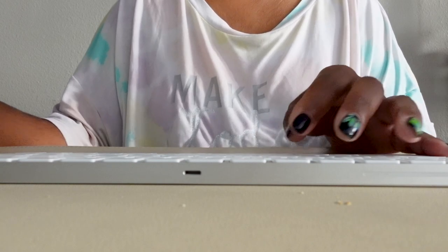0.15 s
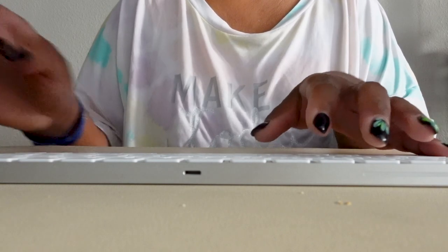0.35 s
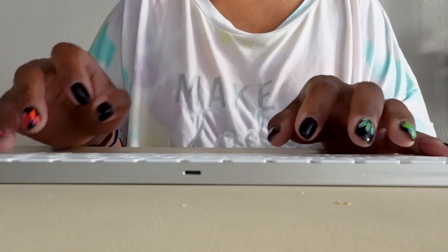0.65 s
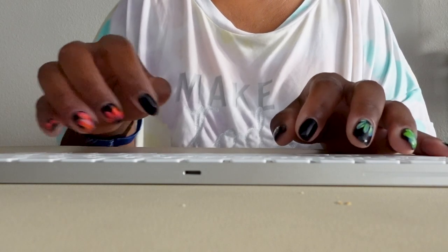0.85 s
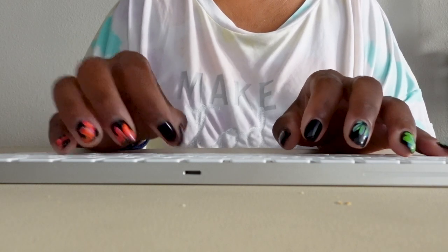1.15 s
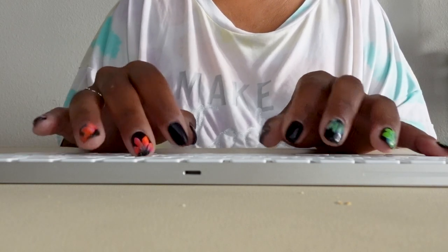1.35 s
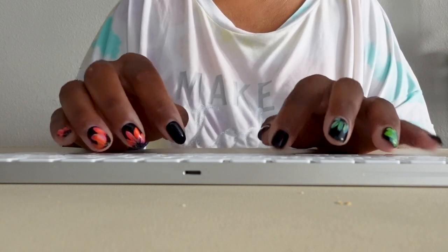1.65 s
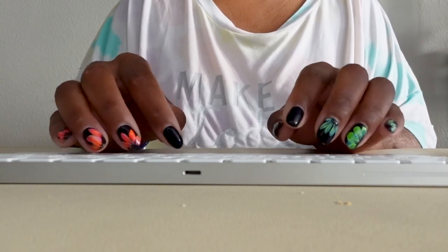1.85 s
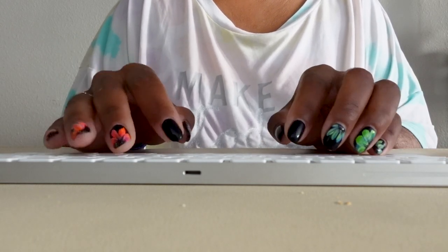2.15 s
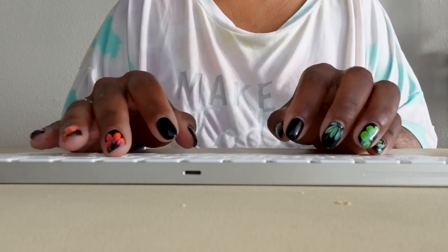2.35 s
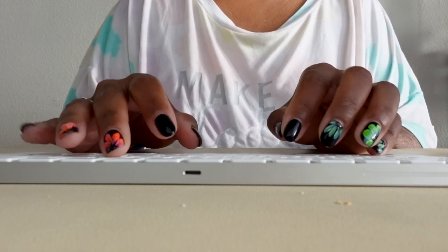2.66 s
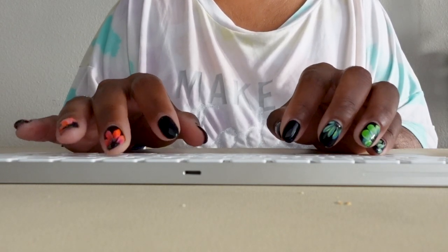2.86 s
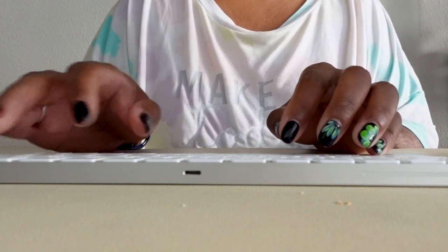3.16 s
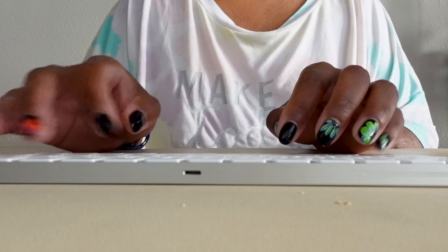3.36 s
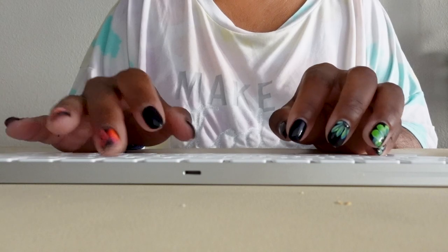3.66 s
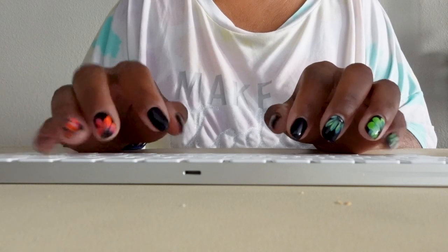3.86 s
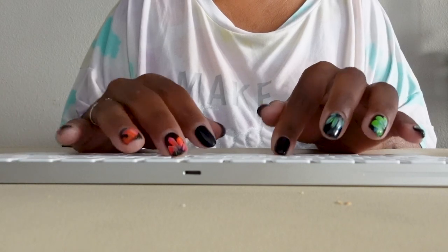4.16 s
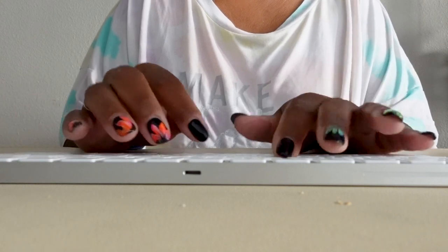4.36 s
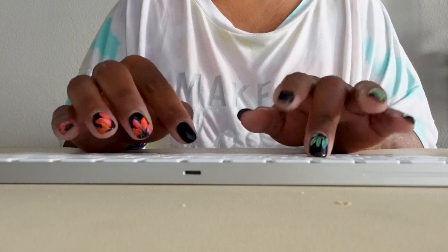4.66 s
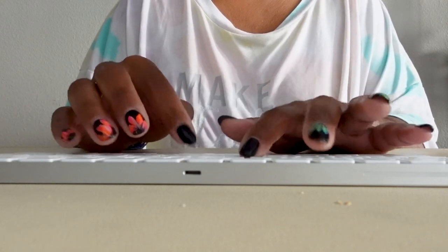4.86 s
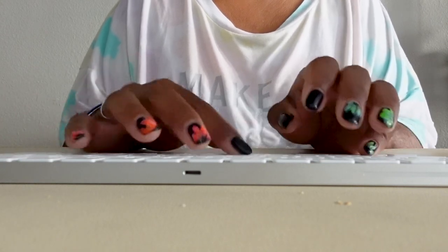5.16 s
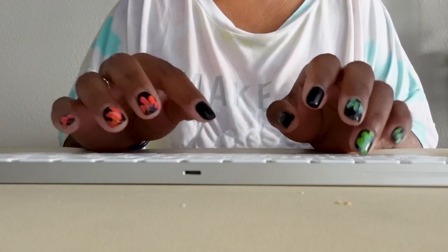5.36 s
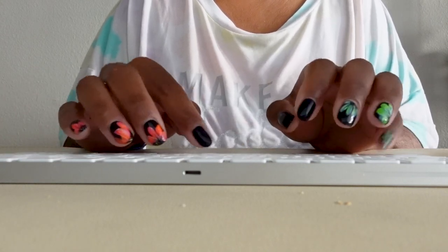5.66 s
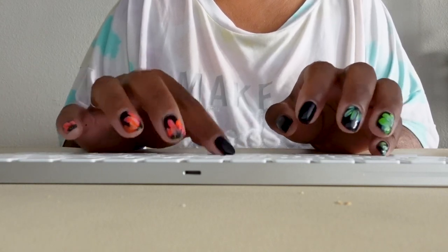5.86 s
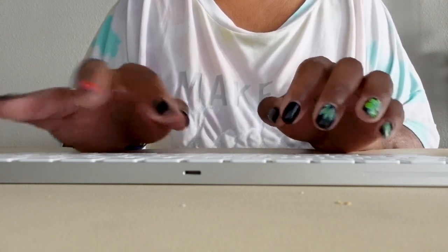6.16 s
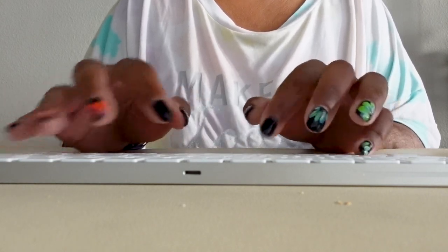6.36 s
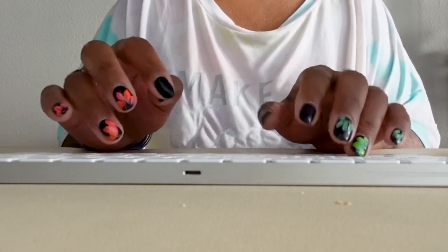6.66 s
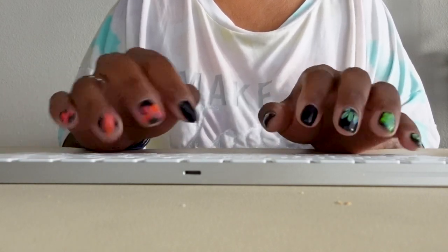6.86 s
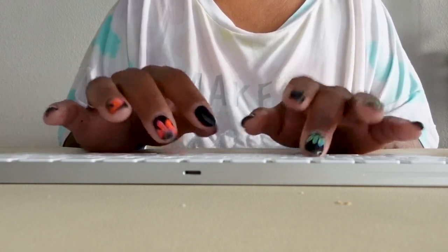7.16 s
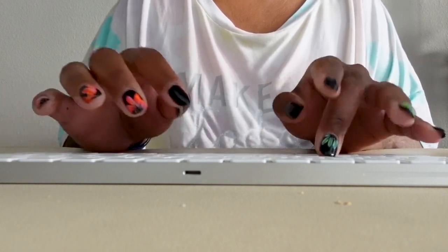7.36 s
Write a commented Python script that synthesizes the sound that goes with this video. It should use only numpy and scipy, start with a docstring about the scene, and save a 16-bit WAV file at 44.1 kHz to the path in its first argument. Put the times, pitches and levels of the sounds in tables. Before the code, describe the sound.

Close, crisp keystrokes with soft desk thumps start sparsely and thicken into fast uneven typing in a small live room with a low hum.

```python
"""A fan hums throughout in a small, live room: wavering tones over coloured noise.
First a nail ticks on a slim keyboard and a hand brushes into place, heard as shaped noise.
Sparse keystrokes by two hands follow, with a dry tap after one second, and crowd together from about
four seconds on: noise-driven resonances click in the caps and clack in the case, and decaying sines
thud in the case and thump in the desk. Early echoes and diffuse tails surround the close sound."""
import sys
import numpy as np
from scipy import signal
from scipy.fft import rfft, irfft, next_fast_len
from scipy.io import wavfile

SR = 44100
rng = np.random.default_rng(int(sys.argv[2]) if len(sys.argv) > 2 else 0)


def digitize_waveform(pressure):
    """Quantize a signal to 16-bit integers and store it at the path in sys.argv[1].

    Rows of a 2-D input are taken as channels; values are limited to [-1, 1].
    """
    field = np.atleast_2d(pressure).T
    bounded = np.clip(field, -1, 1)
    quanta = np.round(bounded * 32767).astype(np.int16)
    wavfile.write(sys.argv[1], SR, quanta)


N = 331191
CLICK_SPAN = .003  # s, over which the level of a click is counted


def amp(db):
    """Logarithmic level: converts decibels to an amplitude factor."""
    return 10 ** (np.asarray(db) / 20)


def unit(x):
    """Normalization: scales a signal to rms 1."""
    return x / np.sqrt(np.mean(x ** 2) + 1e-30)


def read(points, hz):
    """Interpolation: joins (f/Hz, value) points on a logarithmic frequency axis."""
    f, value = np.transpose(points)
    return np.interp(np.log(hz + 1), np.log(f + 1), value)


def add(mix, s, sound):
    """Superposition: adds a sound to the mix from time s on."""
    part = mix[:, max(round(s * SR), 0):][:, :sound.shape[1]]
    part += sound[:, :part.shape[1]]


def band(x, hz, width):
    """Resonance: a steep-sided third-order band filter with the phase of a ringing system."""
    f = np.fft.rfftfreq(x.shape[-1], 1 / SR) + 1
    off = 1j * (f ** 2 - hz ** 2) / (f * width)
    response = 1 / ((1 + off) * (1 + off + off ** 2))
    return irfft(rfft(x) * response, x.shape[-1])


def pair(mid, side, same):
    """Interchannel correlation: left and right of a given likeness from two unrelated signals."""
    same = np.clip(same, -1, 1)
    mid = mid * np.sqrt((1 + same) / 2)
    side = side * np.sqrt((1 - same) / 2)
    return np.array([mid + side, mid - side])


def noise(colour, likeness):
    """Spectral shaping: steady stereo noise of a given colour, at rms 1."""
    size = next_fast_len(N, real=True)
    hz = np.fft.rfftfreq(size, 1 / SR)
    mid, side = rfft(rng.standard_normal((2, size))) * amp(read(colour, hz))
    return unit(irfft(pair(mid, side, read(likeness, hz)), size)[:, :N])


def drift(rate_hz, size=2048):
    """Low-pass random process: a slow wander of rms 1."""
    hz = np.fft.rfftfreq(size, N / SR / size)
    lowpass = np.exp(-(hz / rate_hz) ** 2) * (hz > 0)
    slow = irfft(rfft(rng.standard_normal(size)) * lowpass)
    return unit(np.interp(np.linspace(0, size - 1, N), np.arange(size), slow))


def blow(rise, decay, size=2048):
    """Contact force: a quick rise and an exponential fall, both in seconds."""
    t = np.arange(size) / SR
    return (1 - np.exp(-(t / rise) ** 2)) * np.exp(-t / decay)


def ring(hz, width, force, same, span):
    """Modal excitation: close modes struck once, with the energy of rms 1 over span seconds."""
    mid, side = band(rng.standard_normal((2, len(force))) * force, hz, width)
    return pair(unit(mid), unit(side), same) * np.sqrt(span * SR / len(force))


# tones of the fan: f/Hz, level/dB (rms)
FAN_TONES = [(188.5, -53.5), (236.6, -65), (297, -74.5), (425.3, -76.5), (565.5, -79.5), (753.7, -82.5),
             (1126, -76.5), (1245, -77), (1304.5, -69), (1363, -79), (1423, -71.5)]
# spectrum of rushing air and room noise: f/Hz, relative level per hertz/dB
AIR_COLOUR = [(25, -17), (60, -12), (120, -6), (170, 1), (240, -3), (400, -7), (600, -14), (790, -10),
              (1000, -18.5), (1370, -11.5), (1700, -22), (2400, -25.5), (5000, -29), (10000, -34),
              (16000, -38.5)]
# left-right likeness of that noise: f/Hz, share
AIR_LIKENESS = [(100, 0.91), (250, 0.83), (500, 0.35), (1000, 0.088), (3000, 0.043), (12000, 0.44)]
AIR_DB = -60


def fan(waver=0.00092, flutter=0.16, channel_turn=0.033):
    """Tonal and broadband radiation: modulated tones, whose channels part in phase with f, over air noise."""
    t, out = np.arange(N) / SR, np.zeros((2, N))
    # all tones share one slightly uneven clock
    clock = t + np.cumsum(waver * drift(rate_hz=3.4)) / SR
    for hz, db in FAN_TONES:
        phase = 2 * np.pi * (hz * clock + rng.random())
        offset = channel_turn * hz / 100 * np.array([[1], [-1]])  # radians
        swell = 1 + flutter * drift(rate_hz=10.0)
        tone = swell * np.sin(phase + offset + flutter * drift(rate_hz=16))
        out += np.sqrt(2) * amp(db) * tone
    return out + amp(AIR_DB) * noise(AIR_COLOUR, AIR_LIKENESS)


# reverberation of the room: f/Hz, t60/s, relative level/dB, left-right likeness
REVERBERATION = [(100, 0.81, -1, 1), (302, 0.65, -1, 0.94), (705, 0.84, -3.5, 1), (1660, 0.53, -7, 0.86),
                 (3500, 0.7, -6, 0.13), (5430, 0.51, -10.5, 0.66), (8300, 0.58, -5.5, 0.59),
                 (14900, 0.4, -5.5, 0.65)]


def tail(onset=0.0012):
    """Diffuse decay: noise in which each frequency band dies at its own speed."""
    hz, t, z = signal.stft(rng.standard_normal((2, SR)), SR, nperseg=256)
    t60, db, same = (read(np.array(REVERBERATION)[:, [0, k]], hz)[:, None] for k in range(1, 4))
    energy_scale = np.sqrt(2 * np.log(1000) / (t60 * SR))  # equal energy for every decay time
    z = pair(z[0], z[1], same) * amp(db - 60 * t / t60) * energy_scale
    decay = signal.istft(z, SR, nperseg=256)[1][:, :SR]
    return decay * (1 - np.exp(-(np.arange(SR) / SR / onset) ** 2))


def room(x, count=3):
    """Varied reverberation: random tails fade into one another in a one-second cycle, so hits differ."""
    turn = 2 * np.pi * np.arange(N) / SR  # one turn a second
    shares = [np.sqrt(2 / count) * np.cos(turn + np.pi * k / count) for k in range(count)]
    return sum(signal.oaconvolve(x * share, tail(), axes=1)[:, :N] for share in shares)


# reflections from the typist and nearby surfaces: delay/s, level/dB re direct sound
REFLECTIONS = [(.0026, -12), (0.0095, -25), (0.0107, -17.5), (0.0124, -19), (0.0208, -42)]


def echoes(x):
    """Specular reflection: sharp, delayed and weakened copies of the direct sound."""
    out = np.zeros((2, N))
    for delay, db in REFLECTIONS:
        add(out, delay, amp(db) * x)
    return out


# soft pushes of a finger into the desk: t/s, level/dB before the common gain
DESK_PUSHES = [(.154, -55), (.26, -53), (.623, -46), (1.401, -51.5), (1.482, -53), (1.577, -57),
               (1.695, -56), (2.771, -51), (2.869, -54), (3.253, -61), (3.346, -53), (3.75, -51),
               (3.842, -55), (4.115, -56), (4.202, -50.5), (4.285, -55), (4.403, -54), (4.551, -53),
               (4.79, -48.5), (4.985, -54), (5.368, -53.5), (5.924, -50), (6.291, -46), (6.476, -51),
               (6.784, -47), (7.066, -49.5), (7.139, -52.5), (7.348, -52.5)]


def thumps(desk_hz=108, length=0.033, gain_db=2, detuning=0.059):
    """Low-frequency plate motion: the desk gives under the finger for three or four slow cycles."""
    out, t = np.zeros((2, N)), np.arange(0, length, 1 / SR)
    swell = np.sin(np.pi * (t / length) ** 0.65) ** 2
    for (s, db), (detune, phase) in zip(DESK_PUSHES, rng.random((len(DESK_PUSHES), 2))):
        hz = desk_hz * (1 + detuning * (detune - .5))
        wave = swell * np.sin(2 * np.pi * (hz * t + phase))
        add(out, s, amp(db + gain_db) * np.array([wave, wave]))
    return out


# a hand brushing over the keys: t/s, level/dB
BRUSH_LEVEL = [(.19, -76.5), (.24, -62), (.255, -45), (.26, -56), (.28, -56.5), (.30, -67), (.34, -78)]
# spectrum of the brushing: f/Hz, relative level per hertz/dB
BRUSH_SPECTRUM = [(300, -2), (1000, -7), (2500, -3), (4500, 3.5), (7000, 0.5), (10500, -4), (16000, -22)]
# a fingertip sliding faintly over a key: t/s, level/dB
SLIDE_LEVEL = [(0.511, -73.5), (.54, -64), (.59, -69), (.66, -77), (.72, -83)]


def rubbing(slide_hz=1850, slide_width=250):
    """Friction noise: skin drags over the caps, as a broad brush and then a faint narrow rasp."""
    t = np.arange(N) / SR
    brush_level, slide_level = (amp(np.interp(t, *np.transpose(curve), left=-140, right=-140))
                                for curve in (BRUSH_LEVEL, SLIDE_LEVEL))
    brush = noise(BRUSH_SPECTRUM, [(500, 0.96), (10000, 0.67)])
    grit = rng.standard_normal((2, next_fast_len(N, real=True)))
    rasp = unit(band(grit, slide_hz, slide_width))[:, :N]
    return brush_level * brush + slide_level * rasp


def tap(time_s=1.0751, hz=2200, width=1900, db=-49):
    """Impulsive contact: one dry, very short tick as a hand comes down at the keyboard."""
    out = np.zeros((2, N))
    add(out, time_s, amp(db) * ring(hz, width, blow(.00008, 0.000067), 0.59, CLICK_SPAN))
    return out


# keystrokes, each a click and then the key hitting its stop (also played by clicks): t/s, click level/dB,
# cap ring f/Hz, brightness/dB, travel to the stop/s, thud level/dB, hollow ring level/dB, clack level/dB
KEYSTROKES = [(0.2877, -66, 5500, -2, 0.0002, -54.5, -60, -59),
              (0.6164, -54.5, 5900, -3.5, 0.011, -51, -79, -60),
              (.714, -58, 5830, -4.5, 0.0023, -46, -78, -66), (1.0737, -79, 5170, -10, 0, -61, -62, -47),
              (1.3892, -42.5, 5960, -1.5, .015, -71, -60.5, -56), (3.247, -44, 6300, -12, 0, -39, -66, -56),
              (3.343, -51.5, 5600, -2.5, 0, -46.5, -73, -64.5),
              (3.517, -48, 5550, -3, 0.00054, -53, -65, -59),
              (3.5663, -59.5, 5600, -3.5, 0.0029, -42, -58, -62.5),
              (3.853, -55, 5300, -1.5, 0.0017, -44.5, -61, -59.5),
              (4.201, -57, 5250, -9, 0.000047, -57, -66, -57.5),
              (4.3962, -37.5, 5400, -5, 0.0013, -52, -44.5, -44.5),
              (4.472, -57, 6030, -2, 0.0026, -55, -62, -64), (4.5546, -45, 5400, -9.5, 0, -60, -49.5, -64),
              (4.6128, -43.5, 5560, -29, 0.000092, -66, -56, -75),
              (4.6515, -34.5, 5910, -6, .0044, -48, -68, -69),
              (4.7689, -36.5, 5560, -9, 0.0012, -46.5, -56, -56),
              (4.8815, -37, 5550, -8.5, 0.00027, -51.5, -52, -40),
              (4.98, -45.5, 5800, -18, 0, -56, -63, -70), (5.1404, -65, 5840, -4, 0.0013, -42, -56, -64),
              (5.1955, -41, 5600, 0, 0.0022, -76, -80, -52),
              (5.259, -48, 5700, -2, 0.0017, -45, -65, -60.5),
              (5.3678, -39.5, 6460, -0.5, 0, -47.5, -72, -66),
              (5.747, -55, 5750, -4.5, 0.0014, -54, -67, -61.5),
              (5.8039, -55, 5500, -3, 0, -41.5, -60, -68),
              (5.9169, -45.5, 5700, -1.5, 0.002, -64, -76, -53.5),
              (6.1604, -55, 5700, -2.5, 0, -43, -79, -69.5), (6.288, -39.5, 5930, -2.5, 0, -35.5, -59, -54),
              (6.3591, -36, 5500, -0.5, 0, -45, -52.5, -41), (6.4052, -60, 5800, -8, 0.0013, -45, -67, -85),
              (6.4676, -37, 5300, 0.5, .0013, -64, -60, -52),
              (6.5369, -54, 5900, -1, 0.0038, -45.5, -80, -59.5),
              (6.57, -55, 5600, -4, 0.00054, -54, -65, -61),
              (6.6836, -39.5, 6300, -4, .005, -42.5, -62, -65.5),
              (6.779, -42, 5200, -1.5, 0.0089, -51.5, -61, -57.5),
              (6.8919, -51, 5660, -6, 0.00059, -53.5, -75, -66),
              (7.0605, -44, 4900, -7, 0.0012, -46.5, -58.5, -46.5),
              (7.1365, -56.5, 5230, -18, 0, -52, -74, -68),
              (7.1848, -47, 5800, -9, 0.00034, -45.5, -51, -59.5),
              (7.2292, -48, 5770, -14, 0.0051, -49.5, -57, -68),
              (7.34, -32.5, 5880, 0, 0.003, -38, -46, -53.5), (7.4612, -57.5, 5900, -3.5, 0, -52, -74, -81)]
# middle resonances of the case, the second one hollow: f/Hz, width/Hz
CASE_MODES = [(540, 222), (850, 218)]
# a heavier blow rings longer: ring length factor at a usual thud, and the dB that double it
USUAL_THUD_DB, USUAL_LENGTH, DOUBLING_DB = -49.5, 0.84, 16
# a hard blow (much clack for its thud) raises the low mode; scatter is a share of the frequency
THUD_HZ, THUD_HZ_PER_DB, CLACK_HZ, CASE_SCATTER = 333.4, 1.87, 1386, 0.022
# the lower middle mode lies between thud and clack: share of their gap, and offset
MIDDLE_SHARE, MIDDLE_DB = .55, -3
# a short dry crack comes with every clack, at a level relative to it
STOP_HZ, STOP_WIDTH_HZ, STOP_DB, STOP_DECAY_S = 2060, 1100, -10.5, 0.0011


def knocks(rise=0.0015, decays=(.003, .0027, .0018), clack_width=520, thud_rise=0.0013, thud_decay=0.0045,
           same=(.75, .7, .7), left_db=(-1.5, -1.5, 2.5)):
    """Modal response to impact: at the stop the case bends in a low mode and its higher modes clack."""
    out = np.zeros((2, N))
    strays = rng.standard_normal((len(KEYSTROKES), 2))
    for (s, _, _, _, travel, thud_db, hollow_db, clack_db), stray in zip(KEYSTROKES, strays):
        stop = s + travel
        hardness = clack_db - thud_db
        length = np.clip(USUAL_LENGTH * 2 ** ((thud_db - USUAL_THUD_DB) / DOUBLING_DB), .3, 1.15)
        case_hz = np.array([THUD_HZ + THUD_HZ_PER_DB * hardness, CLACK_HZ])
        thud_hz, clack_hz = (1 + CASE_SCATTER * stray) * case_hz

        swing = blow(thud_rise, thud_decay * length)
        t = np.arange(len(swing)) / SR
        thud = unit(swing * np.sin(2 * np.pi * (thud_hz * t + rng.random()))) * np.sqrt(0.0082 / t[-1])
        add(out, stop, amp(thud_db) * np.array([thud, thud]))

        modes = CASE_MODES + [(clack_hz, clack_width)]
        levels = thud_db + MIDDLE_SHARE * hardness + MIDDLE_DB, hollow_db, clack_db
        for (hz, width), decay, db, alike, left in zip(modes, decays, levels, same, left_db):
            sound = ring(hz, width, blow(rise, decay * length ** 2), alike, span=0.0077)
            gains = amp([[db + left / 2], [db - left / 2]])
            # narrow resonances swell slowly, so their blow begins a little earlier
            add(out, stop - 0.3 / width, gains * sound)

        crack = ring(STOP_HZ, STOP_WIDTH_HZ, blow(rise, STOP_DECAY_S), .9, CLICK_SPAN)
        add(out, stop, amp(clack_db + STOP_DB) * crack)
    return out


# light clicks, first touches just before a knock, and extra clicks layered on a stroke:
# t/s, click level/dB, cap ring f/Hz, brightness/dB
EXTRA_CLICKS = [(0.0365, -63.5, 5400, -7), (.1587, -61.5, 5050, -5), (.359, -58, 6000, -9.5),
                (.7204, -54.5, 5640, 0), (1.2286, -52, 5100, -5), (1.2363, -52, 5500, -4.5),
                (1.306, -58, 5570, -1), (1.481, -48.5, 5500, -33), (1.4925, -52.5, 6600, -11),
                (1.5696, -35.5, 6430, -12), (1.5739, -33.5, 5300, -22.5), (1.58, -50, 4530, -21),
                (1.688, -57, 5950, -9), (2.111, -67.5, 5380, -4), (2.3349, -62.5, 6240, -9),
                (2.7738, -66, 6600, -1.5), (2.8355, -52.5, 4000, -8.5), (2.8596, -62, 4170, -10),
                (2.8679, -63.5, 5900, -3.5), (3.2416, -50.5, 6300, 5.5), (3.352, -53.5, 6600, 6),
                (3.734, -50.5, 5840, -1.5), (3.8448, -52.5, 6940, -1), (3.9444, -56, 5370, -5),
                (3.971, -52, 5750, -2), (4.064, -53, 5130, -3.5), (4.1082, -58, 5500, -1),
                (4.1755, -50, 6100, -6.5), (4.245, -55.5, 6570, -2.5), (4.28, -50.5, 5730, -18),
                (4.295, -51, 5930, -15), (4.3917, -39.5, 5440, -11.5), (4.48, -54, 5550, -16),
                (4.495, -55, 5530, -5), (4.5246, -45, 5500, -15), (4.609, -52, 5360, -2),
                (4.697, -55, 5700, -7), (4.7523, -49.5, 5350, -18), (4.7647, -39.5, 5940, -3),
                (4.877, -34, 5700, -16.5), (5.0934, -58, 6000, -9), (5.367, -40.5, 4250, -5.5),
                (5.9842, -55.5, 5850, -3.5), (6.2847, -44, 5530, -12), (6.357, -43, 6250, -14),
                (6.5634, -51.5, 7000, -5.5), (6.6863, -45, 6000, -1), (7.055, -48, 5800, -5),
                (7.18, -42, 5600, -3), (7.2344, -44.5, 5870, -10)]
# further resonances of every click (dull crack, body, upper ring, nail tick): f/Hz, width/Hz,
# level/dB re cap ring, dB per dB of brightness, dB per dB of force, power of the cap's pitch followed
CLICK_MODES = [(2150, 900, -14.5, 0.1, -0.11, 0), (3890, 2000, -6, 0.74, -0.14, 1),
               (8200, 1820, 0.1, 1.0, 0, 0.043), (12800, 5700, -4.5, 0.93, 0, 0.53)]
CAP_WIDTH_HZ, USUAL_CAP_HZ = 1580, 5680
USUAL_CLICK_DB = -50  # force is counted from a usual click
# shares by which brightness raises the further resonances, and by which they stray between clicks
SHIFT_PER_DB, KEY_SCATTER = 0.03, .028


def clicks(rise=0.00018, decay=0.0015, same=0.93, blur=1.05, grain=0.75, room_db=(-.8, .8, .3, -.8, .6)):
    """Impact-excited resonance: a nail or returning cap snaps on plastic, which rings for milliseconds.
    Returns the sound at the microphone and the smoother average of all directions that feeds the room."""
    near, spread = np.zeros((2, 2, N))
    snap = blow(rise, decay, size=1024)
    impulse = unit(signal.unit_impulse(len(snap)))
    for s, click_db, cap_hz, bright_db, *_ in [*KEYSTROKES, *EXTRA_CLICKS]:
        modes = [(cap_hz, CAP_WIDTH_HZ, click_db)]
        for hz, width, db, by_brightness, by_force, follow in CLICK_MODES:
            force_db = click_db - USUAL_CLICK_DB
            level = click_db + db + by_brightness * bright_db + by_force * force_db
            stray = 1 + SHIFT_PER_DB * bright_db + KEY_SCATTER * rng.standard_normal()
            shift = (cap_hz / USUAL_CAP_HZ) ** follow * stray
            modes.append((hz * shift, width, level))

        for (hz, width, db), send_db in zip(modes, room_db):
            add(near, s, amp(db) * ring(hz, width, snap, same, CLICK_SPAN))
            force = impulse + grain * unit(snap * rng.standard_normal(len(snap)))
            radiated = unit(band(force, hz, width * blur)) * np.sqrt(CLICK_SPAN * SR / len(snap))
            # each resonance enters the room after a small random delay, which smooths the tail
            add(spread, s + .004 * rng.random(), amp(db + send_db) * radiated[None])
    return near, spread


def scene(case_room_db=-2.0, desk_room_db=-3):
    """Direct and reverberant fields plus the fan; blows through case and desk stir the room less."""
    near, spread = clicks()
    case, desk = knocks(), thumps()
    hands = tap() + rubbing()
    wet = room(spread + hands + amp(case_room_db) * case + amp(desk_room_db) * desk)
    return near + echoes(near) + case + desk + hands + wet + fan()


def record(dry, low_cut_hz=52, edge_hz=16100):
    """Band limitation: the microphone sheds the deepest bass, the recorder the highest treble."""
    high_pass = signal.butter(1, low_cut_hz, "high", fs=SR, output="sos")
    dry = signal.sosfiltfilt(high_pass, dry)
    low_pass = signal.firwin(255, edge_hz, window=("kaiser", 8), fs=SR)
    return signal.oaconvolve(dry, low_pass[None], "same")


dry = scene()
out = record(dry)
digitize_waveform(out)
```